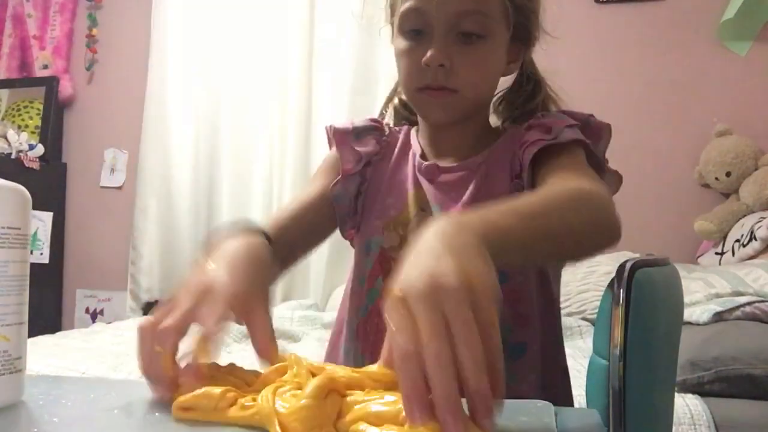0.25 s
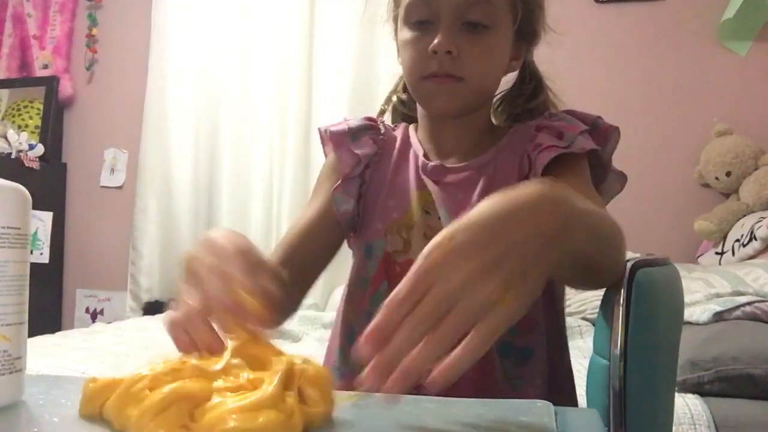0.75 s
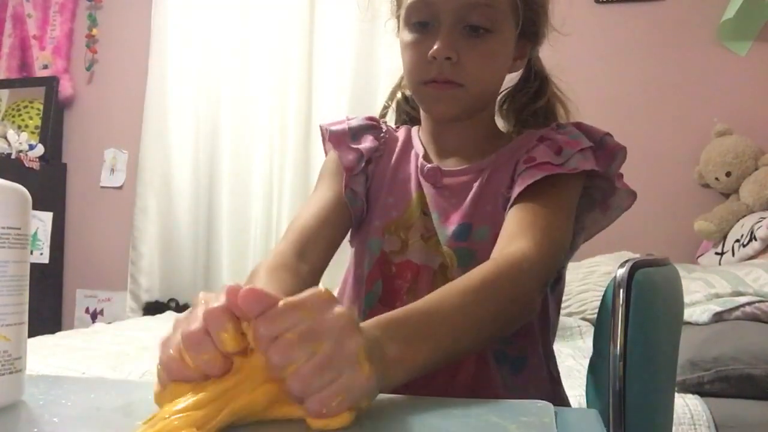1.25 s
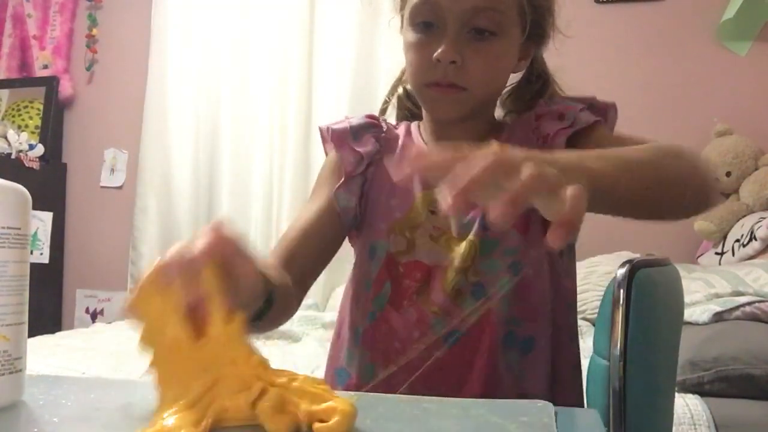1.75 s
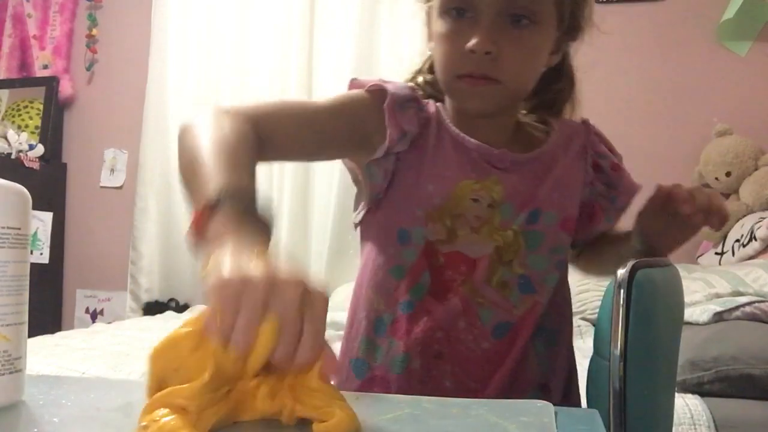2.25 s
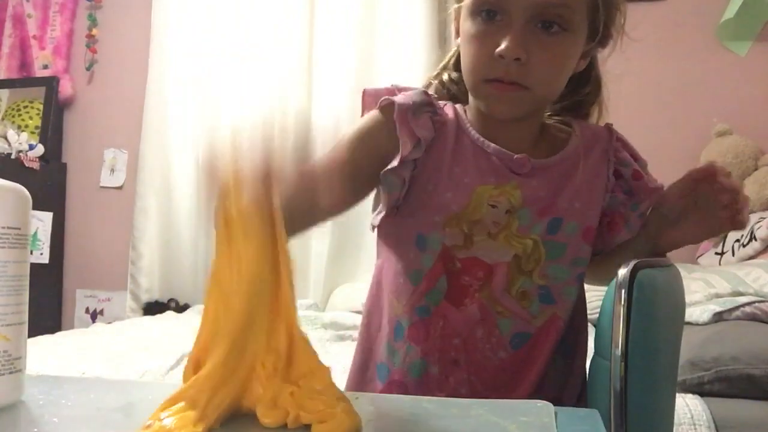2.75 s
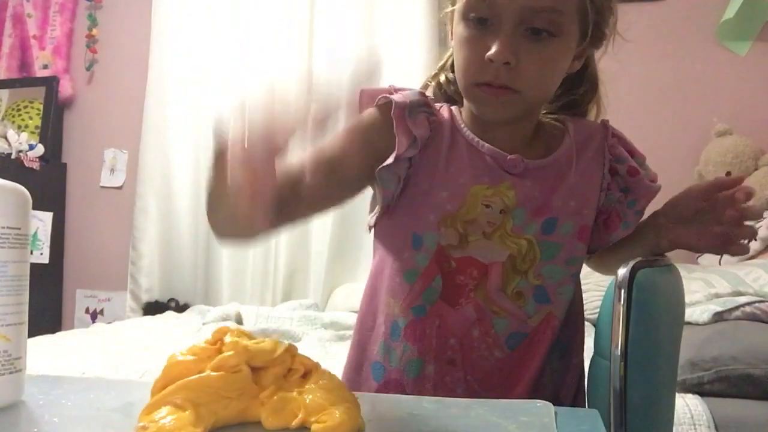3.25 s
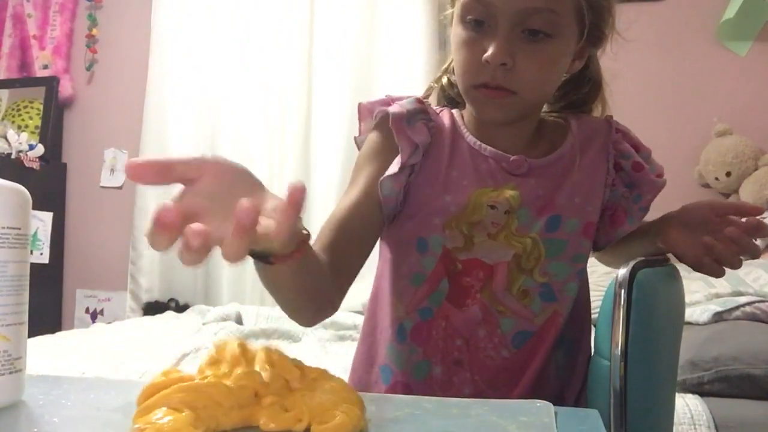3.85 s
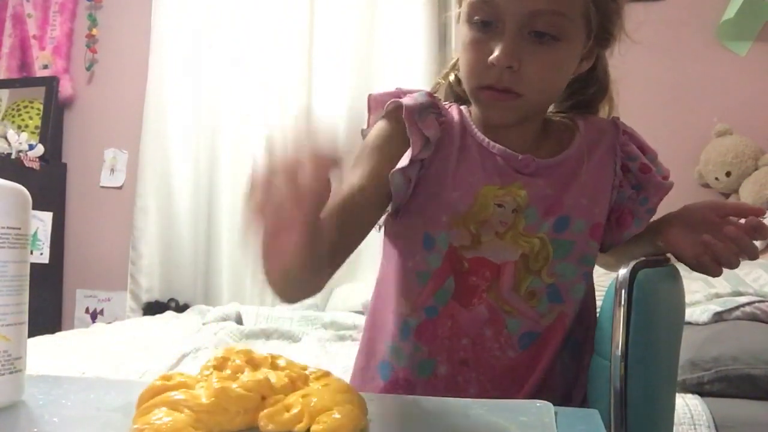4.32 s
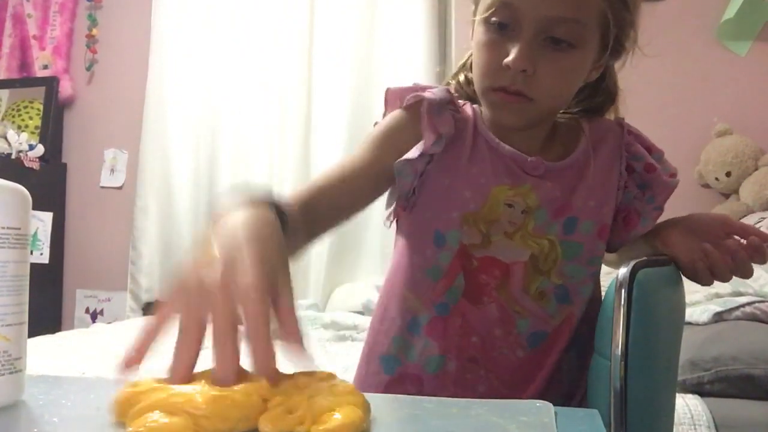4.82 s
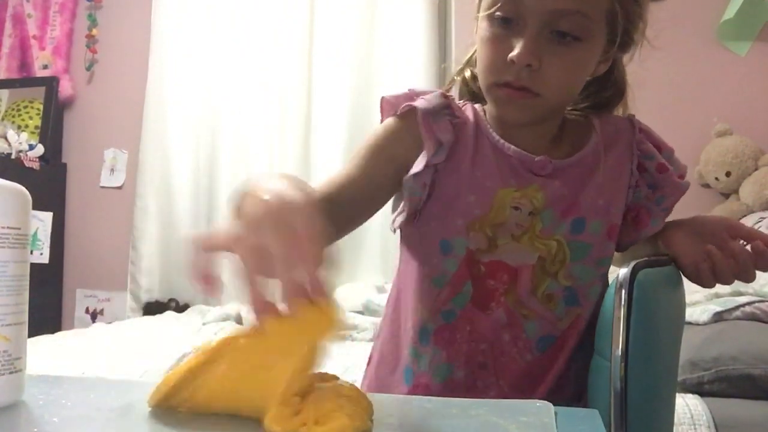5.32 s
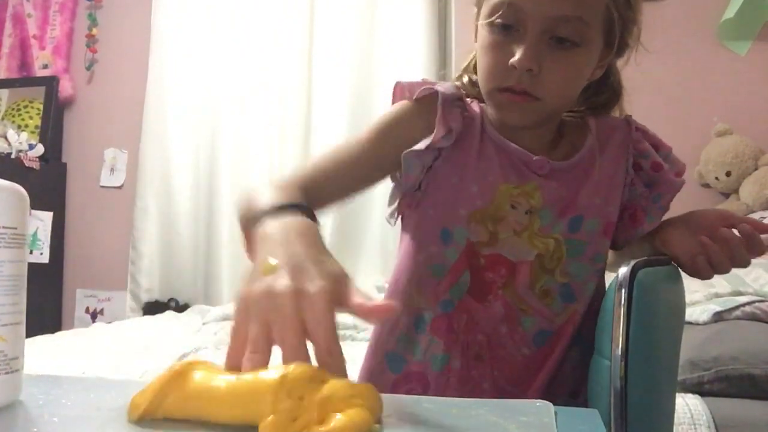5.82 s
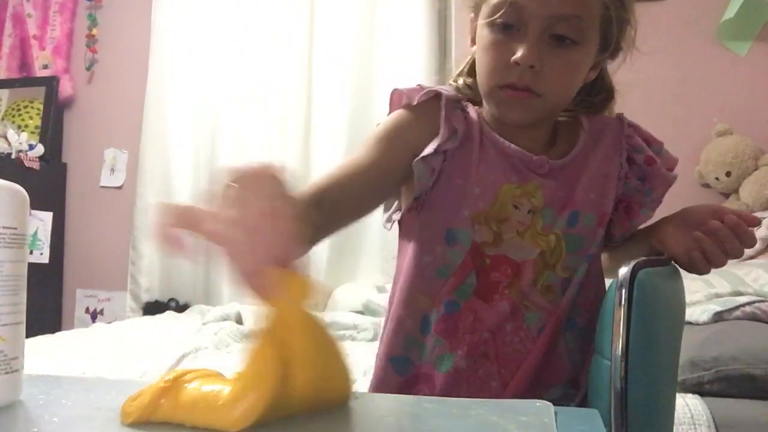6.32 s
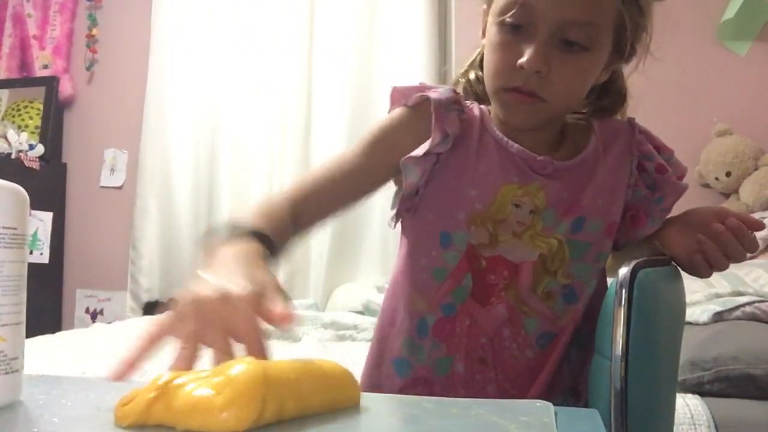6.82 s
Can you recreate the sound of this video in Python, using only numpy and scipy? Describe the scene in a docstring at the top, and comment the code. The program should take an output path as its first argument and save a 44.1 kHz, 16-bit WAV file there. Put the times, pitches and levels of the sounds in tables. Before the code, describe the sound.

A lump of sticky slime is handled close to the microphone in a small, quiet bedroom. A sharp wet pop and thud come early, then a cluster of squeezing snaps, sparse soft peels and taps, and finally a series of strong pokes with crisp cracks, short falling plops and heavier thumps on the table. A faint low room tone continues.

```python
"""A lump of sticky slime is slapped down, poked, pulled and kneaded on a table in a small, quiet bedroom.
Trapped air pockets burst: pulses and short noise filtered into snaps, then swelling tones that fall as plops.
Peeling skin, escaping air and splatter crackle as random band-limited ticks.
Landings and pokes thump as decaying low resonances; reflections and a diffuse tail answer each sound.
Beneath them lies a steady room tone of shaped noise."""
import sys
import numpy as np
from scipy import signal
from scipy.fft import rfft, irfft
from scipy.io import wavfile

SR = 44100
rng = np.random.default_rng(int(sys.argv[2]) if len(sys.argv) > 2 else 0)


def bounce(signal):
    """Save signal as a 16-bit WAV file at the path given by the first command-line argument."""
    frames = np.transpose(np.atleast_2d(signal))
    limited = np.clip(frames, -1, 1)
    pcm = np.round(limited * 32767).astype(np.int16)
    wavfile.write(sys.argv[1], SR, pcm)


N = 311787

AGE = np.arange(SR // 2) / SR   # seconds since an event began
CLICK = 1. * (AGE == 0)   # a single pulse of pressure
EVENT_S = .01   # an event's level is its energy spread over this time
CUTOFF_HZ = 16000   # top of the recorded band


def from_db(db):
    """Convert decibels to an amplitude ratio."""
    return 10 ** (np.asarray(db) / 20)


def unit(x):
    """Normalise a signal to unit energy."""
    return x / np.sqrt(np.sum(x ** 2) + 1e-20)


def at_level(x, db, seconds=EVENT_S):
    """Energy equivalence: give a sound the energy of that level held for so many seconds."""
    return unit(x) * np.sqrt(seconds * SR) * from_db(db)


def butter(x, hz, kind, order=2):
    """Causal filtering with a maximally flat passband."""
    corner = np.clip(hz, 10, .47 * SR)
    sos = signal.butter(order, corner, kind, fs=SR, output="sos")
    return signal.sosfilt(sos, x + 1e-18)


def add(track, s, sound):
    """Superposition: mix a sound into the track from time s on."""
    start = max(round(s * SR), 0)
    track[start:start + len(sound)] += sound[:max(len(track) - start, 0)]


def burst(decay_s):
    """Exponential decay of noise that starts at once."""
    return rng.standard_normal(len(AGE)) * np.exp(-AGE / decay_s)


# spectral density of the room tone; only its shape counts: (f/Hz, relative level/dB per Hz)
ROOM_TONE_SPECTRUM = [(15, -68), (25, -32), (41, -10), (66, 1.5), (200, -7.5), (229, -6), (335, -12),
                      (677, -18.5), (1330, -20), (1440, -21), (1700, -21.5), (1890, -22), (3080, -26),
                      (14400, -32), (16000, -31)]
ROOM_TONE_DB = -63


def room_tone():
    """Stationary noise with a shaped spectral density: steady low rumble and faint hiss."""
    hz, db = np.transpose(ROOM_TONE_SPECTRUM)
    bins = np.maximum(np.arange(N // 2 + 1) * SR / N, 1)
    shape = from_db(np.interp(np.log(bins), np.log(hz), db))
    noise = irfft(rfft(rng.standard_normal(N)) * shape, N)
    return at_level(butter(noise, 22, "high"), ROOM_TONE_DB, N / SR)


# early reflections from the wall and the ceiling: (delay t/s, level/dB)
REFLECTIONS = [(.0030, -12), (.0088, -15), (.0102, -11)]
# diffuse reverberation of the room: (f/Hz, relative level/dB, t60/s)
REVERBERATION = [(100, 1, 0.33), (238, -7.5, 0.23), (570, -13, 0.27), (1500, -4.5, 0.21),
                 (3240, -5.5, 0.26), (7000, 3.5, 0.19), (11100, -10, 0.24), (17000, 3.5, 0.13)]


def room_response(build_s=0.0008):
    """Impulse response: close reflections, then a diffuse tail with frequency-dependent decay."""
    response = np.zeros(len(AGE))
    edges = np.geomspace(70, 17000, 15)
    hz, level_db, t60 = np.transpose(REVERBERATION)
    for low, high in zip(edges, edges[1:]):
        log_centre = np.log(low * high) / 2
        db = np.interp(log_centre, np.log(hz), level_db)
        decay = np.interp(log_centre, np.log(hz), t60)
        band = butter(burst(decay / np.log(1000)), [low, high], "band")
        band *= 1 - np.exp(-AGE / build_s)
        response += unit(band) * np.sqrt(2 * (high - low) / SR) * from_db(db)
    for delay_s, db in REFLECTIONS:
        # small, cluttered surfaces smear the reflection and return little bass
        smear = butter(unit(burst(decay_s=0.00039)), 230, "high", order=1)
        add(response, delay_s, from_db(db) * smear)
    return response


def bedroom(x):
    """Convolution of the sound with the room, whose fine pattern is drawn afresh every half second."""
    out = x.copy()
    for start in range(0, N, len(AGE)):
        block = x[start:start + len(AGE)]
        add(out, start / SR, signal.fftconvolve(block, room_response()))
    return out


# a finger digs in and bursts two large pockets, then meets the table (levels relative):
# (first burst t/s, gap to the second t/s, plop level/dB, plop decay t/s, first crack level/dB,
#  second crack level/dB, cavity ring f/Hz, thump level/dB, contact cut-off f/Hz)
POKES_IN = [(0.7342, .0103, -40, 0.0041, -48.5, -73, 1820, -42.5, 885),
            (4.7011, .0168, -44.5, 0.00858, -43, -43, 8500, -40, 507),
            (5.038, 0.012, -44, 0.0057, -44.5, -59, 7000, -42, 500),
            (5.633, 0.024, -46, 0.0059, -42.5, -36.5, 4030, -46.5, 500),
            (6.0206, .0385, -50, 0.00365, -33, -33.5, 2180, -50.5, 400),
            (6.9486, 0.022, -43.5, 0.00654, -41.5, -32.5, 7040, -40.5, 191)]
POKE_RING_DB = -7.5   # the cavity's ring against the crack


def poke_pockets():
    """Paired cavities of every poke: (s, crack dB, ring Hz, ring dB, plop dB, plop decay s)."""
    rows = []
    for s, gap_s, plop_db, decay_s, first_db, second_db, hz, _, _ in POKES_IN:
        for at, crack_db in ((s, first_db), (s + gap_s, second_db)):
            rows.append((at, crack_db, hz, crack_db + POKE_RING_DB, plop_db, decay_s))
    return rows


# single bursts of air pockets, some of them during pokes (levels relative):
# (t/s, crack level/dB, cavity ring f/Hz, ring level/dB)
SINGLE_BURSTS = [(0.1381, -80, 2130, -58.5), (0.3157, -62, 4520, -53), (0.7384, -41.5, 5500, -43),
                 (.748, -59, 1350, -34), (1.1568, -90, 1650, -56.5), (1.2543, -81, 2000, -59),
                 (1.3151, -68, 3450, -46.5), (1.344, -51, 6370, -47), (1.3672, -40, 4800, -43),
                 (1.3907, -46, 7000, -41), (1.3953, -54, 2400, -59), (1.4005, -57, 2000, -38.5),
                 (1.4137, -35.5, 1700, -53), (1.424, -49, 6540, -45.5), (1.58, -60.5, 2850, -55),
                 (2.1492, -52.5, 2000, -49), (2.1696, -38.5, 7050, -35), (2.2117, -68, 1750, -50),
                 (2.8655, -62, 2000, -58), (2.8988, -64, 1710, -53), (3.127, -75, 2000, -68.5),
                 (3.413, -59, 2000, -57), (3.708, -53, 2000, -48), (4.079, -70, 2120, -59),
                 (4.0844, -51.5, 4380, -57), (4.1512, -73, 3640, -58), (4.719, -62, 7600, -41.5),
                 (4.7365, -65, 3400, -46), (5.069, -66, 6900, -40.5), (6.05, -45, 920, -41.5),
                 (6.0655, -37.5, 2370, -47), (6.2358, -57, 3940, -47)]
# the plop of a single burst grows more slowly than its ring, and is stronger the lower its note
POCKET_HZ, POCKET_RING_DB, POCKET_PLOP_DB = 2000, -46.5, -53
PLOP_FOLLOWS, PLOP_DB_PER_OCTAVE, POCKET_PLOP_S = 0.6, -4.5, 0.00222


def single_bursts():
    """Scaling of the plop with the cavity's ring: (s, crack dB, ring Hz, ring dB, plop dB, plop decay s)."""
    rows = []
    for s, crack_db, hz, ring_db in SINGLE_BURSTS:
        plop_db = POCKET_PLOP_DB + PLOP_FOLLOWS * (ring_db - POCKET_RING_DB)
        plop_db += PLOP_DB_PER_OCTAVE * np.log2(hz / POCKET_HZ)
        rows.append((s, crack_db, hz, ring_db, plop_db, POCKET_PLOP_S))
    return rows


# lump or hand landing on the table: (t/s, relative level/dB, contact cut-off f/Hz)
LANDINGS = [(.3215, -43, 885), (.339, -41, 230), (.757, -45.5, 128), (1.01, -55, 164), (1.677, -50, 249),
            (1.701, -55, 240), (2.903, -52.5, 126), (3.085, -68, 198), (3.443, -51, 342),
            (3.475, -52.5, 83.6), (3.575, -61, 516), (3.722, -54.5, 402), (5.196, -36.5, 363),
            (5.718, -40.5, 138), (5.763, -33.5, 223), (6.2375, -32.5, 480), (6.2535, -39.5, 313),
            (6.638, -56.5, 414)]
PRESS_S = 0.004   # from the second pocket to the table


def blows():
    """Impacts on the table, landings and the ends of pokes: (s, dB, contact cut-off Hz)."""
    pokes = [(s + gap_s + PRESS_S, db, contact_hz) for s, gap_s, *_, db, contact_hz in POKES_IN]
    return [*LANDINGS, *pokes]


# low resonances of table and room: (f/Hz, relative level/dB, t60/s)
LOW_RESONANCES = [(78.5, -0.5, 0.14), (115.6, -4, 0.086), (140.4, -6, 0.16), (175.4, 2.5, 0.067),
                  (211.3, -0.5, 0.088), (274.7, 4, 0.099), (360, -4, 0.07), (533, 4, 0.026),
                  (703, 8, 0.068), (1112, -8, 0.02)]


def thumps(scatter_db=3.0, settle_s=0.02, settle_db=-6):
    """Resonance excited by a soft blow and the settling lump; a softer contact passes less treble."""
    out = np.zeros(N)
    hz, resonance_db, t60 = np.transpose(LOW_RESONANCES)
    resonances = np.cos(2 * np.pi * hz[:, None] * AGE) * np.exp(-np.log(1000) * AGE / t60[:, None])
    for s, db, contact_hz in blows():
        strengths = from_db(resonance_db + scatter_db * rng.standard_normal(len(hz)))
        force = CLICK + from_db(settle_db) * unit(burst(settle_s))
        ringing = signal.fftconvolve(force, strengths @ resonances)[:len(AGE)]
        blow = butter(ringing, contact_hz, "low", order=3)
        # the microphone picks up little deep bass
        picked_up = butter(blow, 71, "high", order=3)
        add(out, s, at_level(picked_up, db + 3.5))
    return out


SQUEEZE_REF_HZ, SQUEEZE_DB, SQUEEZE_DB_PER_OCTAVE = 500, -8, 7.5   # contact cut-off, level against the blow


def squeezes():
    """Air displacement by each blow, stronger the more abrupt the contact: (s, dB)."""
    rows = []
    for s, db, hz in blows():
        abruptness = np.log2(hz / SQUEEZE_REF_HZ)   # octaves
        rows.append((s, db + SQUEEZE_DB + SQUEEZE_DB_PER_OCTAVE * abruptness))
    return rows


# slime peeling off skin and table: (t/s, length t/s, relative level/dB, brightening/dB per octave)
PEELINGS = [(.096, 0.034, -71, -1.5), (0.385, 0.12, -67.5, -2), (.74, 0.025, -42, -4),
            (1.282, 0.059, -59, -2), (1.329, 0.058, -64, -2), (1.532, 0.09, -61, -1.8),
            (2.026, 0.12, -71.5, -0.7), (2.169, 0.0097, -45.5, 3), (2.313, 0.089, -66, -0.5),
            (2.886, 0.02, -59, -3), (2.955, 0.075, -69.5, -1), (3.409, .026, -58.5, -1),
            (3.491, 0.022, -68.5, 1.5), (3.796, 0.12, -74.5, 1.5), (4.152, 0.043, -70.5, 1.5),
            (6.631, 0.016, -68.5, 2.5), (6.77, 0.0096, -62, -0.5)]
# air fizzes out after the crack of a poked pocket, for longer from one with a longer plop
FIZZ_DELAY_S, FIZZ_DECAYS, FIZZ_DB, FIZZ_TILT_DB = .0025, 2.64, -3, 12
# torn threads crackle around a burst; level against the plop
THREADS_SHIFT_S, THREADS_S, THREADS_DB, THREADS_TILT_DB = -.005, 0.0153, -10, 0.5
SPLAT_S, SPLAT_DB, SPLAT_TILT_DB = .016, -12, -1   # level against the squeezed air


def crackles():
    """Granular events of peeling, fizz, threads and splatter: (s, length s, dB, dB per octave)."""
    fizz = [(s + FIZZ_DELAY_S, FIZZ_DECAYS * decay_s, crack_db + FIZZ_DB, FIZZ_TILT_DB)
            for s, crack_db, *_, decay_s in poke_pockets()]
    threads = [(s + THREADS_SHIFT_S, THREADS_S, plop_db + THREADS_DB, THREADS_TILT_DB)
               for s, *_, plop_db, _ in single_bursts()]
    splatter = [(s, SPLAT_S, db + SPLAT_DB, SPLAT_TILT_DB) for s, db in squeezes()]
    return [*PEELINGS, *fizz, *threads, *splatter]


def peels(threads_per_s=2400, spread_db=4.5, knee_hz=1100):
    """Random impulse process: fine ticks, each with a size and a pitch of its own, merge into a crackle."""
    out = np.zeros(N)
    pitches = np.geomspace(450, 14000, 11)
    for s, length_s, db, tilt_db in crackles():
        released = rng.random(len(AGE)) < threads_per_s / SR
        sizes = from_db(spread_db * np.minimum(rng.exponential(1, len(AGE)), 3))
        pick = rng.integers(0, len(pitches), len(AGE))
        signs = rng.choice([-1, 1], len(AGE))
        pull = np.sqrt(np.abs(np.sin(np.pi * np.minimum(AGE / length_s, 1))))
        ticks = released * pull * sizes * signs
        crackle = 0
        for k, hz in enumerate(pitches):
            # energy per octave follows the tilt above the knee and fades gently below it
            above = max(hz / knee_hz, 1)
            gain = from_db(tilt_db * np.log2(above)) / np.sqrt(above)
            crackle = crackle + gain * butter(ticks * (pick == k), [hz / 1.25, hz * 1.25], "band")
        add(out, s, at_level(crackle, db + 2.0, length_s))
    return out


# a plop of the reference decay starts at PLOP_HZ; slower ones start lower
PLOP_HZ, PLOP_REF_S, PLOP_PITCH_POWER = 2000, 0.00446, -0.12
SQUEEZE_HZ, SQUEEZE_S = 1243, 0.0054   # the low plop of air pressed out by a blow


def openings():
    """Cavities opened by every pocket and every blow: (s, dB, starting pitch Hz, decay s)."""
    rows = []
    for s, *_, db, decay_s in poke_pockets() + single_bursts():
        start_hz = PLOP_HZ * (decay_s / PLOP_REF_S) ** PLOP_PITCH_POWER
        rows.append((s, db, start_hz, decay_s))
    return rows + [(s, db, SQUEEZE_HZ, SQUEEZE_S) for s, db in squeezes()]


# resonances that every plop stirs: (f/Hz, width f/Hz, level/dB)
PLOP_RESONANCES = [(321, 113, 16), (645, 160, 8.5)]


def plops(open_hz=170, wet_db=-8, ragged_hz=450, squelch_hz=900):
    """Cavity resonance falling as the soft cavity widens; its ragged opening modulates the note."""
    out = np.zeros(N)
    ragged, fall = .55, .4   # modulation depth; pitch-fall time against decay
    for s, db, hz, decay_s in openings():
        # plops that die faster also fall faster
        pitch = open_hz + (hz - open_hz) / (1 + AGE / (fall * decay_s))
        swell = np.sqrt(AGE) * np.exp(-AGE / decay_s)
        flutter = butter(rng.standard_normal((2, len(AGE))), ragged_hz, "low")
        flutter *= ragged / flutter.std()
        loudness, phase_shift = flutter
        phase = 2 * np.pi * np.cumsum(pitch) / SR + phase_shift
        note = unit(swell * (1 + loudness) * np.sin(phase))
        squelch = unit(butter(burst(decay_s), [squelch_hz / 3, squelch_hz * 3], "band"))
        add(out, s, at_level(note + from_db(wet_db) * squelch, db - 7.0))
    coloured = out.copy()
    for hz, width, db in PLOP_RESONANCES:
        coloured += from_db(db) * signal.lfilter(*signal.iirpeak(hz, hz / width, fs=SR), out)
    return coloured


def snaps(crack_hz=10500, ring_s=0.0017, broad_db=-3):
    """Impulsive rupture: the film tears with a sharp pulse, its rim flutters, the small cavity rings."""
    out = np.zeros(N)
    flutter_s, flutter, ringing = .0022, .8, 1.2   # rim decay; noise amounts against the pulse
    # dispersion: the soft film spreads the pulse over a fraction of a millisecond, treble first
    poles = np.poly([.7, .7, .7])
    pulse = signal.lfilter(poles[::-1], poles, CLICK)
    for s, crack_db, hz, cavity_db, _, _ in poke_pockets() + single_bursts():
        tear = pulse + flutter * unit(burst(flutter_s))
        crack = butter(butter(tear, crack_hz, "high"), CUTOFF_HZ, "low")
        excitation = pulse + ringing * unit(burst(ring_s))
        ring = unit(butter(excitation, [hz / 1.35, hz * 1.35], "band"))
        # the tear itself reaches well below the cavity's note
        rim = pulse + unit(burst(flutter_s / 2))
        broad = unit(butter(rim, [hz / 6, hz * 1.1], "band", order=1))
        cavity = ring + from_db(broad_db) * broad
        add(out, s, at_level(crack, crack_db - .5) + at_level(cavity, cavity_db - .5))
    return out


def scene():
    """Superposition of slime and table in the room with the room tone, heard by one microphone."""
    slime_and_table = snaps() + plops() + peels() + thumps()
    return (bedroom(slime_and_table) + room_tone())[None]


def record(dry):
    """Band limitation: a steep elliptic low-pass cuts the top."""
    sos = signal.ellip(10, .1, 70, CUTOFF_HZ, fs=SR, output="sos")
    return signal.sosfilt(sos, dry)


dry = scene()
out = record(dry)
bounce(out)
```